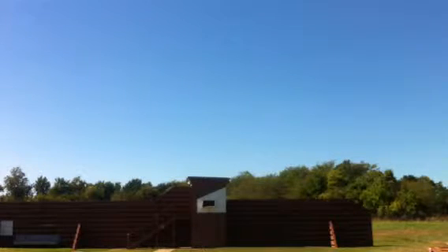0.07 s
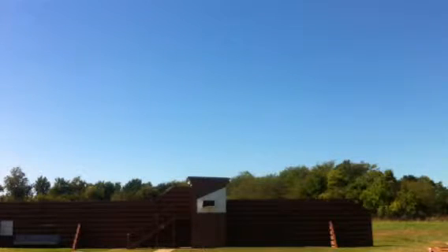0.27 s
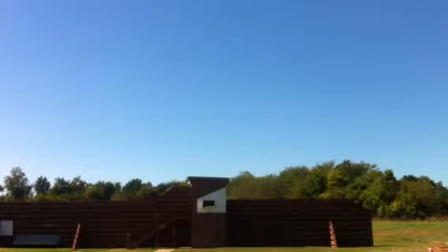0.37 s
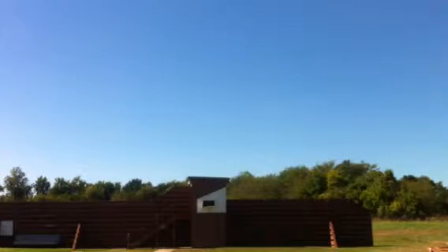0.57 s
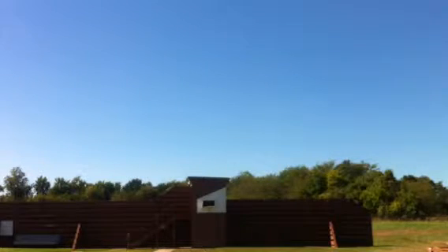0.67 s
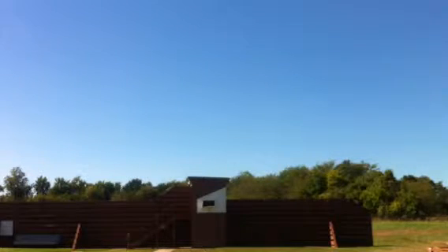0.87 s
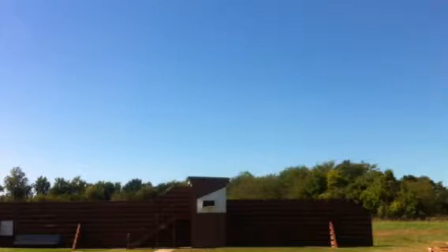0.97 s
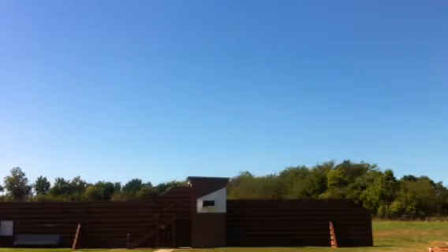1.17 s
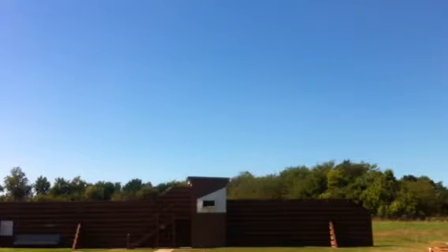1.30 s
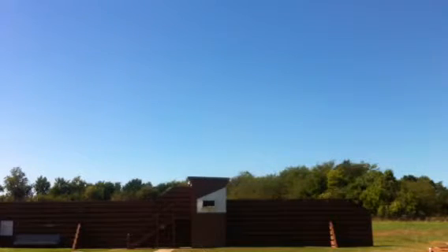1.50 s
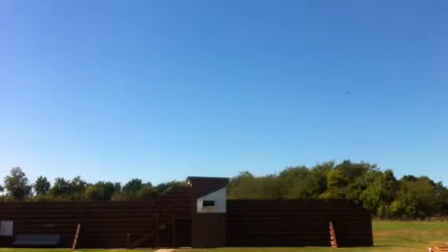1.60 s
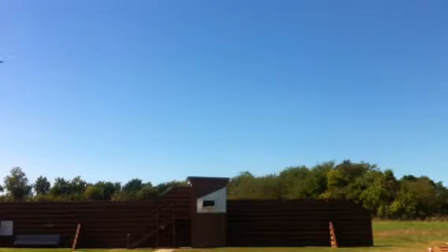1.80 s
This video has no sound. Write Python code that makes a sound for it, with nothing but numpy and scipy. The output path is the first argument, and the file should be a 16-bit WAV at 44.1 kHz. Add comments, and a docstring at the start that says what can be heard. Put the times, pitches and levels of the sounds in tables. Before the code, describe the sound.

A shotgun being handled clicks twice, snaps shut with a brief steel ring, then gives a hollow wooden clack and another click. A few faint ticks follow. It sounds close, outdoors, over quiet hiss and a faint distant motor.

```python
"""Steel and wood snapping shut

A mechanism, probably a shotgun being handled, clicks, snaps shut and clacks at an outdoor range.
Each contact rings the wooden stock and the steel parts and comes back from nearby surfaces.
Behind it lie quiet hiss, a faint electrical buzz and the drone of a distant motor."""
import sys
import numpy as np
from scipy import signal
from scipy.fft import rfft, irfft, next_fast_len
from scipy.io import wavfile

SR = 44100
rng = np.random.default_rng(int(sys.argv[2]) if len(sys.argv) > 2 else 0)


def to_wav(s):
    """Save 16-bit WAV."""
    ch = np.atleast_2d(s).T  # columns
    pcm = np.round(np.clip(ch, -1, 1) * 32767)  # PCM
    wavfile.write(sys.argv[1], SR, pcm.astype(np.int16))


N = 81585
T = np.arange(N) / SR


def from_db(db):
    """Turn decibels into a gain."""
    return 10 ** (np.asarray(db) / 20)


def unit_energy(x):
    """Scale to an energy of one."""
    return x / np.sqrt(np.sum(x ** 2) + 1e-20)


def fade(fade_s):
    """Die away by 60 dB in fade_s seconds."""
    return np.exp(-np.log(1000) * T / fade_s)


def at_hz(table, hz, column=1):
    """Read a table at any pitch, sliding between its rows."""
    table = np.array(table)
    return np.interp(np.log(hz), np.log(table[:, 0]), table[:, column])


def band(x, low_hz, high_hz):
    """Keep the sound between two pitches."""
    return signal.sosfilt(signal.butter(2, [low_hz, high_hz], "band", fs=SR, output="sos"), x)


def noise_bands():
    """Give (centre_hz, noise) for each narrow band from bass to treble."""
    edges = np.geomspace(25, 17500, 29)
    for low, high in zip(edges, edges[1:]):
        yield np.sqrt(low * high), band(rng.standard_normal(N + SR // 4), low, high)[-N:]


def add(out, start_s, sound):
    """Mix a sound in at its start time."""
    start = int(start_s * SR)
    out[start:start + len(sound)] += sound[:N - start]


# Tone of the hiss: pitch_hz, relative_db
HISS_TONE = [(30, -6), (75, -3), (110, 7.5), (170, 10), (300, 1.5), (800, 3), (1200, 1), (1700, -1.5),
             (2300, -3.5), (3200, -1), (4400, -8.5), (5200, -1.5), (6000, -2), (7500, -8), (10300, -8),
             (12200, -5), (15500, -7.5)]

def hiss(level_db=-60, flicker_db=2.36, fade_db_per_s=1):
    """Slowly fading hiss over a low outdoor murmur, each band flickering a little."""
    moments = np.linspace(0, T[-1], 24)
    out = 0
    for hz, noise in noise_bands():
        flicker = flicker_db * np.interp(T, moments, rng.standard_normal(len(moments)))
        out += noise * from_db(at_hz(HISS_TONE, hz) + flicker)
    return from_db(level_db - fade_db_per_s * T) * np.sqrt(N) * unit_energy(out)


# Overtones that stand out of the buzz: pitch_multiple, level_db
BUZZ_STRONG = [(4, -78), (8, -78), (9, -83), (10, -74), (12, -77), (14, -73), (16, -79), (17, -84),
               (18, -77), (19, -82), (20, -83), (33, -76), (34, -83), (36, -84), (37, -79), (38, -80),
               (39, -80), (40, -81), (43, -85), (45, -76), (48, -83), (50, -80), (51, -72), (52, -77),
               (53, -77), (54, -83), (55, -77), (63, -79), (65, -84), (67, -82), (69, -81), (71, -74),
               (73, -71), (75, -77), (77, -81), (79, -82), (81, -84), (83, -83), (85, -83), (90, -86),
               (91, -78), (105, -82)]
# Outline of the other overtones: pitch_hz, level_db
BUZZ_WEAK = [(240, -80), (480, -87), (1100, -88), (1400, -93), (2400, -86), (3200, -86), (4400, -99),
             (5100, -98), (5900, -93), (7200, -99)]

def electrical_buzz(pitch_hz=59.98):
    """One cycle of steady overtones repeats as a buzz."""
    size = 4096
    multiples = np.arange(4, 120)
    strong = dict(BUZZ_STRONG)
    db = [strong.get(k, at_hz(BUZZ_WEAK, k * pitch_hz)) for k in multiples]
    spectrum = np.zeros(size // 2 + 1, complex)
    spectrum[multiples] = from_db(db) * np.exp(2j * np.pi * rng.random(len(multiples)))
    cycle = irfft(spectrum) * size / np.sqrt(2)
    return np.interp(pitch_hz * T, np.arange(size) / size, cycle, period=1)


# How the motor's hum moves: time_s, pitch_hz, level_db
MOTOR_PATH = [(0.0, 127.6, -66.5), (0.292, 127.8, -65.5), (0.412, 137.5, -65.5), (0.432, 135.1, -57),
              (0.524, 128.6, -60.5), (1.776, 128.5, -68.5), (1.85, 132, -81)]
# Tones in the hum: pitch_multiple, relative_db
MOTOR_TONES = [(1, -1), (1.5, -11), (2, -18)]

def distant_motor():
    """A far motor hums with a slightly wandering speed."""
    time_s, hz, db = np.transpose(MOTOR_PATH)
    phase = 2 * np.pi * np.cumsum(np.interp(T, time_s, hz)) / SR
    hum = sum(from_db(level) * np.sin(k * phase) for k, level in MOTOR_TONES)
    return np.sqrt(2) * from_db(np.interp(T, time_s, db)) * hum


def chatter(chatter_s, strength=1.41):
    """One touch, then a dying run of tiny impacts; strength weighs them against the touch."""
    t = T[:SR // 20]
    force = strength * unit_energy(rng.standard_normal(len(t)) * np.exp(-t / chatter_s))
    force[0] = 1
    return force


def strike(tones, hits):
    """Hits (start_s, level_db, chatter_s) ring a part's tones; narrower tones ring longer."""
    out = np.zeros(N)
    for start_s, db, chatter_s in hits:
        sound = 0
        for hz, width_hz, tone_db in tones:
            decay = np.exp(-np.pi * width_hz / SR)
            feedback = [1, -2 * decay * np.cos(2 * np.pi * hz / SR), decay * decay]
            ring = signal.lfilter([1, 0, -1], feedback, chatter(chatter_s))
            sound += from_db(tone_db) * unit_energy(ring)
        gain = from_db(db) * np.sqrt(.002 * SR)  # as much energy as 2 ms at this level
        add(out, start_s, gain * unit_energy(sound))
    return band(out + 1e-18, .75 * tones[0][0], 1.016 * tones[-1][0])


# Tones of the stock, frame, latch and bright steel edge: pitch_hz, width_hz, relative_db
WOOD_TONES = [(574, 67, -9.5), (880, 73, -4), (1247, 206, 6.5), (1530, 130, -0.5), (1820, 180, 6)]
FRAME_TONES = [(2170, 110, -3.5), (2500, 930, -7), (3180, 200, 1.5), (3370, 280, 1), (4220, 370, -0.5),
               (4850, 880, 8)]
LATCH_TONES = [(5300, 250, 4), (5604, 210, 4), (5930, 270, 10), (6236, 120, 1.5), (6510, 160, 3.5),
               (6930, 240, -4), (6550, 220, -3)]
EDGE_TONES = [(8060, 170, 0.5), (8570, 460, 0.5), (9500, 630, 3.5), (12100, 560, -5), (11870, 570, 4),
              (13500, 1170, 3.5), (15400, 660, 0)]
# Clicks and a few of their close echoes: start_s, wood_db, frame_db, latch_db, edge_db, chatter_ms
CLICKS = [(.0137, -54, -51, -55, -74, .6), (0.0548, -35, -34.5, -36, -54, 0.33),
          (.2450, -46.5, -30.5, -28.5, -57, 1.1), (0.2467, -40, -29.5, -25.5, -40.5, 2),
          (0.266, -44.5, -50, -31.5, -55, 1.6), (.3068, -54, -51, -52, -72, 1),
          (.3925, -46, -56, -47, -81, 1.2), (0.3999, -41, -42, -32, -43, 0.4),
          (0.4006, -40, -28, -28, -58, 5.1), (0.4111, -36, -35, -35, -69, 1.4),
          (0.4148, -43.5, -20.5, -17, -27, 0.23), (.4163, -31, -16.5, -18.5, -35.5, 1.1),
          (0.4213, -36.5, -28, -24.5, -39, 0.43), (.4297, -40, -45, -34, -40, 4.6),
          (.4362, -47, -37, -28, -45, 0.8), (0.4588, -40.5, -40, -40, -63, 4.5),
          (0.4752, -44, -56, -37.5, -54, 2.6), (0.4955, -56, -67, -45.5, -72, .6),
          (0.5067, -50, -44, -45, -70, 4), (.5225, -67, -70, -53, -64, 2.5),
          (0.531, -74, -68, -53, -56, 0.88), (0.549, -33.5, -38, -41.5, -57, 2.1),
          (0.6237, -34.5, -30, -20, -42, 2.2), (1.288, -50.5, -64, -73, -68, 2.5),
          (1.3063, -56.5, -61, -45, -67, 2.3), (1.487, -55, -51, -54, -74, 4.1)]

def clicks(wood_lag_s=0.000922):
    """Clicks of the mechanism and a few close echoes: steel rings first, wood just after."""
    start_s, wood_db, frame_db, latch_db, edge_db, chatter_ms = np.transpose(CLICKS)
    chatter_s = chatter_ms / 1000
    out = strike(WOOD_TONES, zip(start_s + wood_lag_s, wood_db, chatter_s))
    for tones, db in (FRAME_TONES, frame_db), (LATCH_TONES, latch_db), (EDGE_TONES, edge_db):
        out += strike(tones, zip(start_s, db, chatter_s))
    return out


# Sound scattered by the surroundings: pitch_hz, level_db, fade_s
SCATTER_BANDS = [(199, -7, 0.24), (800, -8.5, 0.07), (1610, -6.5, 0.13), (3540, -16.5, 0.1),
                 (6500, -11, 0.057), (8500, -7, 0.033), (14000, -31, 0.037)]

def scatter(x, late_db=-18, late_fade_s=1, rise_s=0.0027):
    """The surroundings scatter sound into a short wash with a faint, longer tail."""
    rise = 1 - np.exp(-T / rise_s)
    late = from_db(late_db) * unit_energy(fade(late_fade_s))
    wash = 0
    for hz, noise in noise_bands():
        early = unit_energy(rise * fade(at_hz(SCATTER_BANDS, hz, column=2)))
        wash += from_db(at_hz(SCATTER_BANDS, hz)) * noise * np.hypot(early, late)
    return signal.fftconvolve(x, wash)[:N]


# Bounces off nearby surfaces: delay_s, level_db
BOUNCES = [(.0150, -4), (0.0217, -16.5), (.0295, -29)]

def echoes(x, smear_s=0.00052):
    """Rough surfaces send back bright echoes, each slightly smeared in time."""
    bright = band(x, 5730, 8100) + from_db(-11.5) * x
    size = next_fast_len(N + SR // 4)
    out = np.zeros(N)
    for delay_s, db in BOUNCES:
        smear = rfft(chatter(smear_s, strength=1.7), size)
        smear /= np.abs(smear)  # changes the timing, not the tone
        add(out, delay_s, from_db(db) * irfft(rfft(bright, size) * smear, size))
    return out


# Taps on small parts: start_s, pitch_hz, level_db
LIGHT_TAPS = [(0.2489, 1653, -40), (.3070, 1770, -45.5), (.4760, 1260, -41.5), (.5070, 3260, -43),
              (0.6229, 3220, -32), (1.3070, 3400, -52), (1.486, 1330, -47.5)]

def taps(width_hz=135, chatter_s=0.00099):
    """Each light tap rings one small part at a single pitch."""
    return sum(strike([(hz, width_hz, 0)], [(start_s, db, chatter_s)]) for start_s, hz, db in LIGHT_TAPS)


# Low tones of a bump: pitch_hz, width_hz, relative_db
BUMP_TONES = [(45, 30, -27), (130, 45, -13), (160.3, 43, 10), (253, 120, -7), (324, 24, -6)]
# Handling bumps: start_s, level_db
BUMP_HITS = [(0.412, -44), (0.42, -38), (.433, -36.5), (0.447, -53), (.800, -48), (0.83, -52)]

def bumps(chatter_s=0.0011):
    """Handling makes soft, low bumps."""
    return strike(BUMP_TONES, [(start_s, db, chatter_s) for start_s, db in BUMP_HITS])


# Lasting ring of the steel: pitch_hz, level_db, fade_s
STEEL_RING = [(2060, -46, 0.13), (2264, -25.5, 0.052), (2218, -64, 0.62), (4950, -53, 0.023),
              (5400, -41, .17), (5940, -42.5, 0.16), (6223, -49, .25), (6660, -50, 0.13), (6806, -47, 0.08),
              (7060, -43, 0.2)]

def snap_ring(start_s=.4155, edge_db=-26.5, frame_db=-27.5, rattle_s=0.0079):
    """As the mechanism locks shut, loose parts rattle and the steel rings on."""
    out = strike(EDGE_TONES, [(start_s, edge_db, rattle_s)])
    out += strike(FRAME_TONES, [(start_s, frame_db, rattle_s / 2)])
    for hz, db, fade_s in STEEL_RING:
        add(out, start_s, from_db(db) * fade(fade_s) * np.sin(2 * np.pi * hz * T))
    return out


# Tones of hollow wood: pitch_hz, width_hz, relative_db
CLACK_TONES = [(359.5, 18, -6.5), (555, 46, 1), (682, 33, -12), (880, 134, 9.5), (1220, 43, 3.5),
               (1350, 210, -6)]
# A knock, its two quick echoes and a faint later knock: start_s, level_db
CLACKS_AND_ECHOES = [(0.551, -29), (.5655, -42), (.5730, -40), (1.680, -53)]

def clacks(chatter_s=0.00019):
    """A knock makes the wood ring hollow and echoes twice; a faint knock comes later."""
    return strike(CLACK_TONES, [(start_s, db, chatter_s) for start_s, db in CLACKS_AND_ECHOES])


def scene():
    """The mechanism and its echoes over the quiet background."""
    background = hiss() + electrical_buzz() + distant_motor()
    mechanism = clicks() + taps() + bumps() + snap_ring() + clacks()
    return (background + mechanism + scatter(mechanism) + echoes(mechanism))[None]


def record(dry, dip_hz=10450, dip_share=0.37, cutoff_hz=15900):
    """The microphone has a narrow dip in the treble; the very top is cut steeply."""
    notched = signal.lfilter(*signal.iirnotch(dip_hz, Q=9.6, fs=SR), dry)
    dipped = dry + dip_share * (notched - dry)
    return signal.sosfilt(signal.ellip(10, .2, 70, cutoff_hz, fs=SR, output="sos"), dipped)


dry = scene()
out = record(dry)
to_wav(out)
```